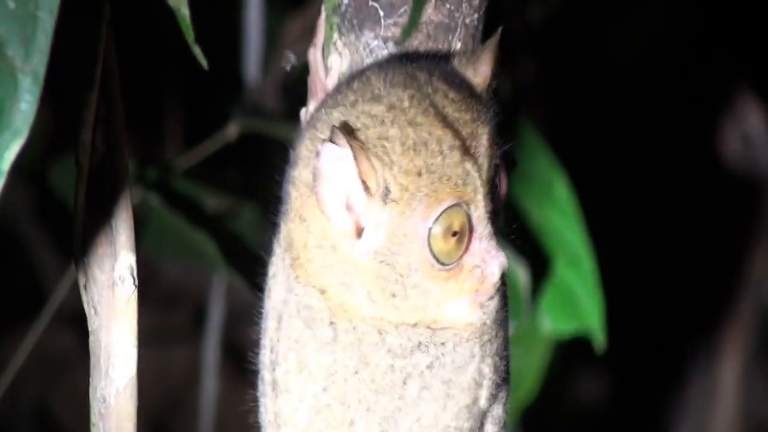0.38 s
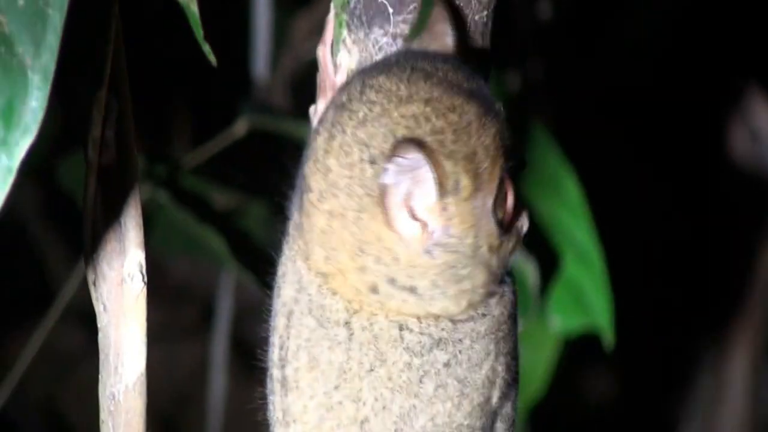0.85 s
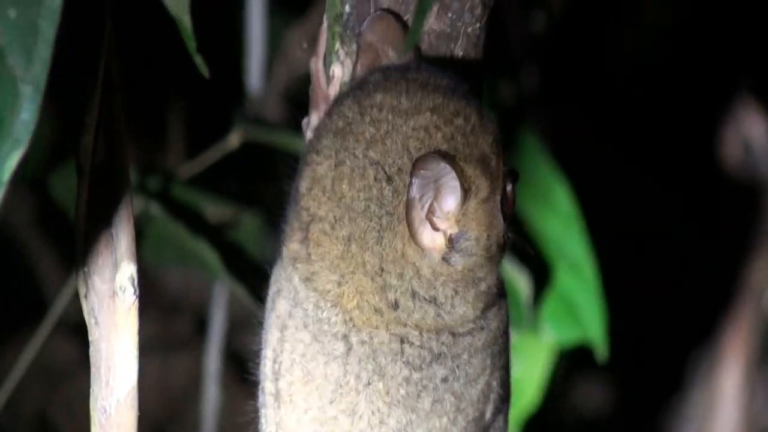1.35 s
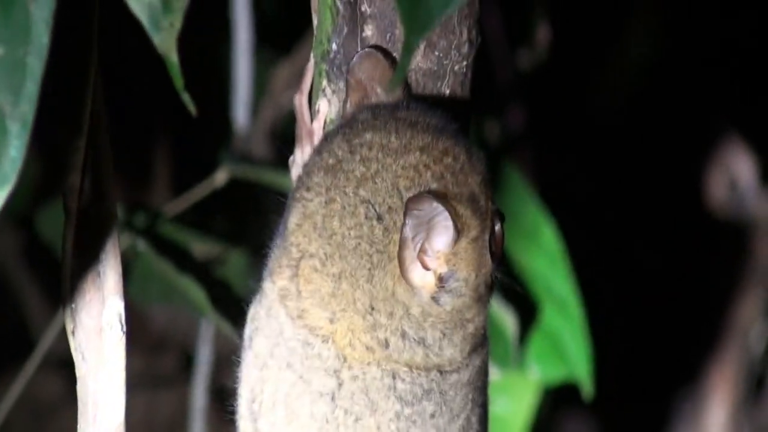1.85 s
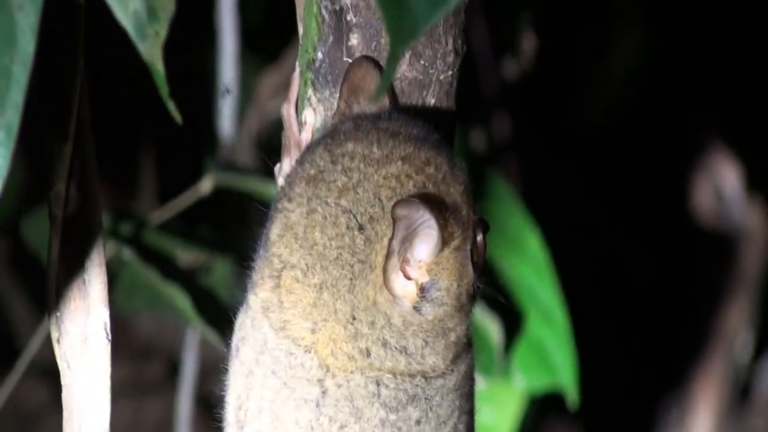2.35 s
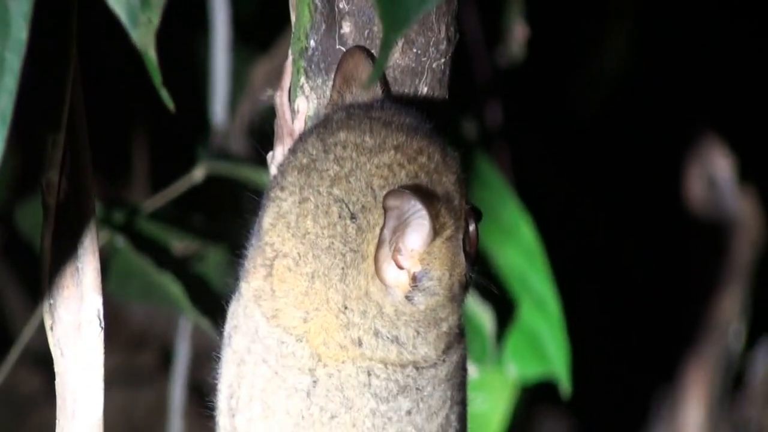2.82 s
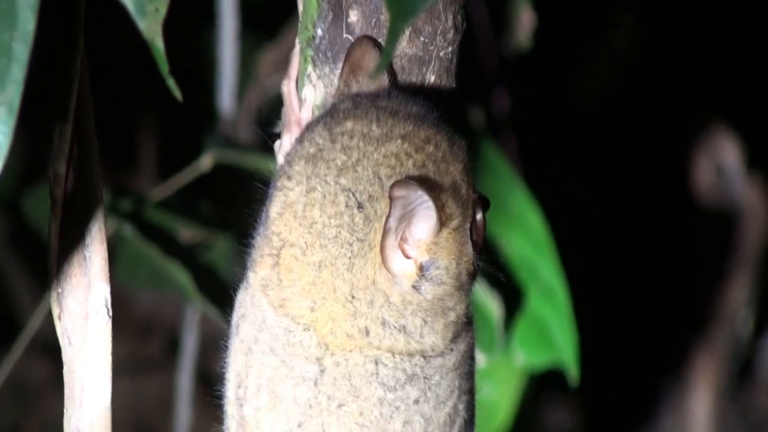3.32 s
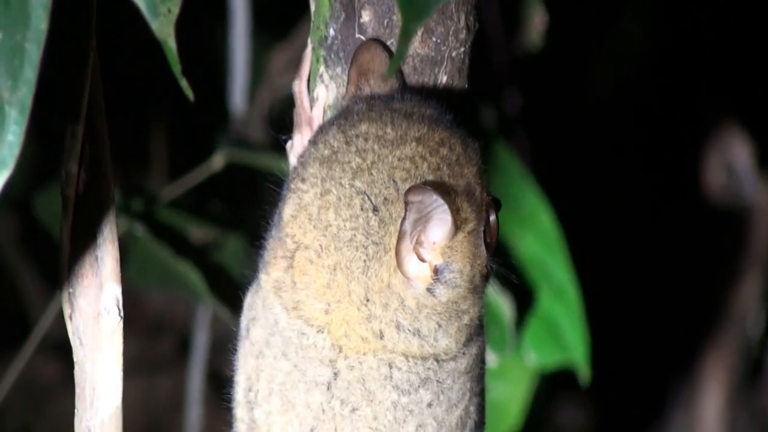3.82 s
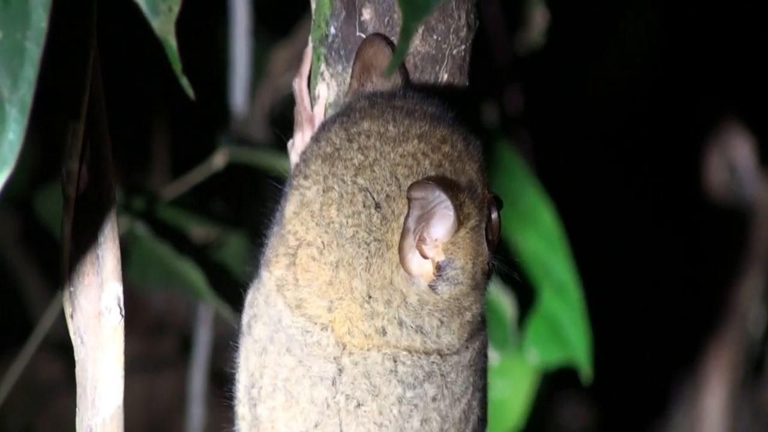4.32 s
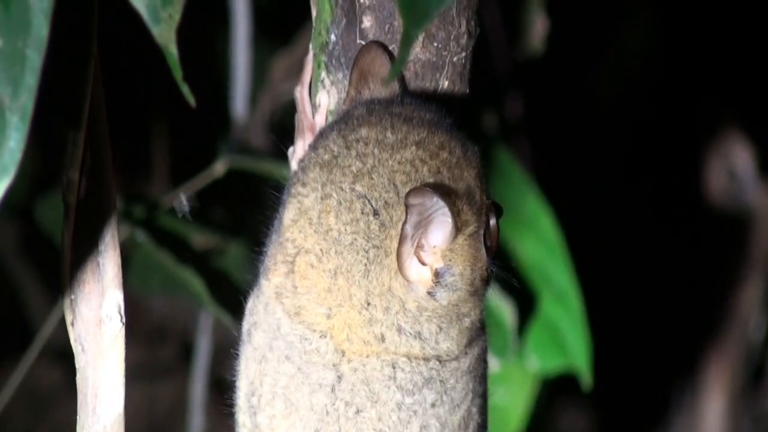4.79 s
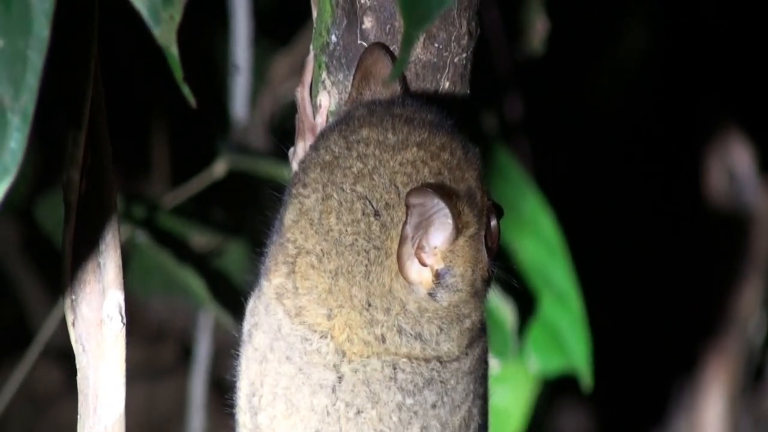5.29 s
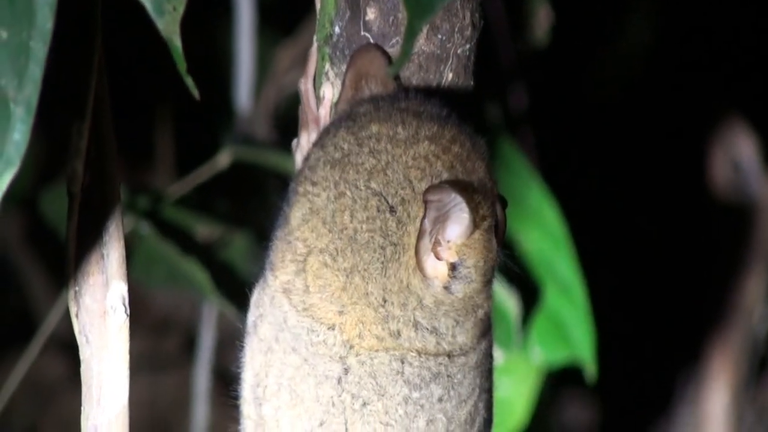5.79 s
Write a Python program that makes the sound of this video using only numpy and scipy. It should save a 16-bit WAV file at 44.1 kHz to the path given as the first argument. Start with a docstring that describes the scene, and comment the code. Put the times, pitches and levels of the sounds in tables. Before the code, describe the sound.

A steady, high ringing chorus of far night insects fills about six seconds, dense around 4 to 7 kHz with a thinner sheen above, over soft dull hiss and a barely audible hum. A near cricket, a little left, gives short purring trills near 4.9 kHz at 0.0, 0.8, 1.9, 2.8, 4.0 and 5.2 s, with a faint trunk echo. Higher answering trills near 6.2 kHz come at 0.3, 0.9, 1.6, 2.2, 3.0, 3.8, 4.4, 5.0 and 5.6. Tiny double chirps repeat every half second until 4.2. Far rasps pulse quickly, and a faint whistler swells in phrases. Drips and bright snaps cluster at 0.3-0.55, then tick at 2.5 and 2.9, with softer drips at 4.0 and 5.2. Very high trills appear around 2.7-3.3 and from 4.9; thin squeaks pass near 1.6 and 5.3, with a faint low warble about 5.5. A crisp buzzer enters at 5.7.

```python
"""Rainforest night chorus

One near cricket trills about once a second; others answer higher up, each at its own wing pitch and stroke
rate: tones gated and slid stroke by stroke. Far singers blur into ringing bands of flickering noise.
Drips and snaps are band-filtered clicks, foliage echoes the songs, the camera hums faintly under hiss."""
import sys
import numpy as np
from scipy import signal
from scipy.fft import rfft, irfft
from scipy.io import wavfile
from scipy.ndimage import uniform_filter1d

SR = 44100
rng = np.random.default_rng(int(sys.argv[2]) if len(sys.argv) > 2 else 0)


def output_pcm(signal):
    """Save a mono or channel-first signal as 16-bit PCM at the path in sys.argv[1].

    Samples are clipped to [-1, 1] before scaling.
    """
    pcm = np.clip(np.atleast_2d(signal).T, -1, 1) * 32767
    wavfile.write(sys.argv[1], SR, np.round(pcm).astype(np.int16))


def gain_from_db(level_db):
    """Turn a decibel level (scalar or array-like) into a linear amplitude factor."""
    decades = np.asarray(level_db, float) / 20
    return 10 ** decades


N = 271215
T = np.arange(N) / SR


def walk(rate_hz):
    """Random levels held 1 / rate_hz and slewed twice; spread near 1."""
    k = int(SR / rate_hz)
    held = np.repeat(rng.standard_normal(N // k + 1), k)
    return 1.3 * uniform_filter1d(uniform_filter1d(held, k), k)[:N]


def place(x, pan_db):
    """Left and right at the given level difference."""
    return x * gain_from_db(np.array([pan_db / 2 + 0 * T, -pan_db / 2 + 0 * T]))


def read(rows, fade_s=0.0054):
    """Gate that fades outside a curve's span, then the curve's columns at every sample."""
    s, *columns = np.transpose(rows)
    gate = np.clip(np.minimum(T - s[0], s[-1] - T) / fade_s + 1, 0, 1)
    return [gate] + [np.interp(T, s, c) for c in columns]


def note(start_s, length_s, attack_s, release_s):
    """Envelope: linear swell, hold to the end of length_s, linear fade."""
    swell = (T - start_s) / attack_s
    fade = (start_s + length_s - T) / release_s + 1
    return np.clip(np.minimum(swell, fade), 0, 1)


def strokes(comb_hz, wing_hz, rate_hz, rise_hz, duty, jitter, scatter_db, slip_turns, start_s=None, modes=()):
    """Scraped wing: each stroke swells, fades and slides in pitch; the ring's phase drifts between strokes.

    modes: (multiple of the ring, Hz below it, level dB)."""
    count = np.cumsum(rate_hz * (1 + jitter * walk(30))) / SR + rng.random()
    if start_s is not None:
        count = np.maximum(count - count[int(start_s * SR)], 0)
    index, part = count.astype(int), count % 1
    size_db, drift = rng.standard_normal((N // 100, 2)).T
    swell = np.sin(np.pi * np.clip(part / duty, 0, 1)) ** .65
    # the slide sums to nothing over a stroke: the comb stays put while the resonance moves over it
    slide = ((wing_hz - comb_hz) * part + rise_hz * (part * part - part) / 2) / rate_hz
    turns = comb_hz * T + slide + slip_turns * np.cumsum(drift)[index]
    ring = np.sin(2 * np.pi * turns)
    for multiple, below_hz, db in modes:
        ring = ring + gain_from_db(db) * np.sin(2 * np.pi * (multiple * turns - below_hz * part / rate_hz))
    swell_rms = np.sqrt(np.mean(swell[count > 0] ** 2) / 2)
    return gain_from_db(scatter_db * size_db)[index] * swell * ring / swell_rms


# faint hum tones: pitch_hz, level_db
HUM = [(840, -79.5), (1190, -86)]


def hum():
    """Faint camera tones: sines wavering slowly in level."""
    return sum(np.sqrt(2) * gain_from_db(db + 2.4 * walk(6.6)) * np.sin(2 * np.pi * hz * T) for hz, db in HUM)


# side level against mid, for all the hiss: freq_hz, side_db
SIDE_WIDTH = [(30, -13), (60, -23), (110, -8.5), (200, -2.5), (380, 0), (1290, 2.5), (2380, 1),
              (4400, -4.5), (8120, -18.5), (11300, -3), (11800, -37)]


def hiss(colour_rows, level_db, flicker_db):
    """Coloured noise in overlapping bands half an octave apart, each flickering alone; ears partly alike."""
    hz = np.maximum(np.arange(N // 2 + 1) * SR / N, 1)

    def curve(rows):
        points_hz, db = np.transpose(rows)
        return gain_from_db(np.interp(np.log(hz), np.log(points_hz), db))

    colour = curve(colour_rows)
    mid = rfft(rng.standard_normal(N)) * colour
    side = rfft(rng.standard_normal(N)) * colour * curve(SIDE_WIDTH)
    out = 0
    for octave in np.arange(4, 14.5, .5):
        band = np.cos(np.pi * np.clip(np.log2(hz) - octave, -.5, .5))
        out = out + gain_from_db(flicker_db * walk(9)) * irfft(band * band * np.array([mid + side, mid - side]), N)
    return out * gain_from_db(level_db) / np.std(out.mean(axis=0))


# colour of the air: freq_hz, relative_density_db
AIR = [(15, -42), (25, -23), (70, -1), (299, -3.5), (409, -1.5), (753, -4), (837, -2.5), (910, -4),
       (3280, -11), (3570, -11), (3800, -18.5), (4940, -26), (8360, -120)]


def air():
    """Dull hiss of the air: noise falling away towards the treble."""
    return hiss(AIR, level_db=-65.5, flicker_db=1.16)


def band_noise(low_hz, high_hz):
    """Noise through a steep band, at unit rms."""
    band = signal.butter(4, (low_hz, high_hz), "band", fs=SR, output="sos")
    noise = signal.sosfilt(band, rng.standard_normal(N))
    return noise / noise.std()


# low rumble level curve: time_s, level_db
RUMBLE = [(0.0, -87), (1.0, -77), (1.6, -83.5), (3.4, -77), (3.8, -77.5), (4.26, -69.5), (4.71, -70),
          (4.98, -75.5), (6.15, -74)]


def rumble():
    """Dull low noise that grows later on."""
    return gain_from_db(read(RUMBLE)[1]) * band_noise(60, 93)


# very high katydid swells: start_s, length_s, level_db
HIGH_KATYDID = [(.45, .22, -72), (.98, .22, -71), (1.54, .1, -73)]


def high_katydid():
    """Very high katydid: thin noise at the very top, swelling slowly and fading faster."""
    gain = sum(gain_from_db(db) * note(s, length, attack_s=.12, release_s=.06) for s, length, db in HIGH_KATYDID)
    return gain * band_noise(15000, 15800)


# colour of the blurred chorus: freq_hz, relative_density_db
CHORUS = [(2180, -19), (3700, -19.5), (3930, -10), (4290, -1), (4710, 3.5), (4990, 2.5), (5230, -15),
          (5720, -0.5), (6160, -2.5), (6530, 1), (6760, -22), (7250, -20), (7400, -14), (9620, -43),
          (16300, -120)]
# colour of its upper sheen: freq_hz, relative_density_db
SHEEN = [(4350, -41), (7400, 6.5), (7810, 1), (8160, -50.5), (9000, 3), (9870, -5), (10900, -6),
         (11500, -15), (12500, -4.5), (15100, -11.5), (15800, -6)]


def blurred_chorus():
    """Singers too many and far to tell apart: noise peaked into ringing bands."""
    return hiss(CHORUS, level_db=-57.5, flicker_db=1.12) + hiss(SHEEN, level_db=-66.5, flicker_db=1.0)


def low_crowd():
    """Far low crickets: five stroked tones at their own pitches and rates."""
    singers = [(4370, 62.), (4450, 81.), (4560, 36.0), (4700, 54.0), (4810, 200.0)]  # pitch_hz, rate_hz
    crowd = sum(gain_from_db(-70.5 + 3.2 * walk(5)) * strokes(hz, hz, rate, 110, 1.0, .05, 1.4, 0.25)
                for hz, rate in singers)
    return place(crowd, 1.0)


# katydid rasp bands: pitch_hz, scrape_rate_hz, added_burst_db, steady_db
RASPS = [(7945, 260., -76.5, -75), (8685, 290., -69, -79)]


def rasping_katydid():
    """Far katydid: fast uneven scrapes smear over wide bands, in even bursts."""
    first_s, every_s, sounding_share = -0.016, .268, .65
    phase = (T - first_s) / every_s % 1
    bursts = np.sin(np.pi * np.clip(phase / sounding_share, 0, 1))
    out = 0
    for hz, rate, burst_db, steady_db in RASPS:
        gain = (gain_from_db(steady_db) + gain_from_db(burst_db) * bursts) * gain_from_db(2.0 * walk(4.04))
        out = out + gain * strokes(hz, hz, rate, -800, 0.98, .3, 2.9, .4)
    return place(out, .2)


# ticker level curve: time_s, level_db
TICKER = [(0, -69.5), (1.2, -73.5), (2.0, -70), (4.75, -71), (5.0, -80), (6.15, -74)]


def ticker():
    """Far ticker: slow, very uneven strokes."""
    gain = gain_from_db(read(TICKER)[1] + 2.8 * walk(12))
    return place(gain * strokes(7080, 7080, 34., -200, 0.95, .4, 3.4, 0.34), .8)


# whistler phrases: start_s, length_s, level_db
WHISTLE = [(-.3, 0.84, -64), (1.0, .85, -67.5), (2.497, 0.8, -66), (3.852, 0.76, -62.5), (5.0, 0.81, -65.5)]


def whistler():
    """Far whistler: stroked tone whose pitch climbs into each phrase."""
    wing_hz, slack_hz, settle_s = 5982, 300, .3
    out = 0
    for s, length, db in WHISTLE:
        hz = wing_hz - slack_hz * np.exp(-np.maximum(T - s, 0) / settle_s)
        gain = gain_from_db(db + 2.0 * walk(12)) * note(s, length, attack_s=.25, release_s=.08)
        out = out + gain * strokes(5945, hz, 118., -100, 0.91, 0.017, 3.2, 0.1515)
    return place(out, 1.5)


def buzzer():
    """Crisp falling pulses whose pitch climbs as the song starts."""
    start_s, attack_s, level_db = 5.66, .1, -65.5
    wing_hz, slack_hz, settle_s = 9430, 330, 0.22
    after_s = np.maximum(T - start_s, 0)
    hz = wing_hz - slack_hz * np.exp(-after_s / settle_s)
    gain = np.minimum(after_s / attack_s, 1) * gain_from_db(level_db)
    return gain * strokes(9500, hz, 54., -700, .45, .015, 1.2, .3)


# squeaks and a low warble, one curve each: time_s, pitch_hz
GLIDES = [
    [(1.52, 9260), (1.598, 11100), (1.644, 11200), (1.68, 10420), (1.722, 10240), (1.75, 11400),
     (1.81, 11700)],
    [(5.16, 11000), (5.21, 11500), (5.27, 10750), (5.324, 10500), (5.39, 9700), (5.452, 9700), (5.5, 10400),
     (5.53, 10400)],
    [(5.33, 200), (5.376, 208.5), (5.41, 260), (5.444, 281.4), (5.512, 275.3), (5.572, 212), (5.612, 256.4),
     (5.7, 222)],
]
# one per curve: level_db
GLIDES_DB = [-75, -72.5, -73.5]


def glides():
    """Thin sines that wander and waver in pitch and level."""
    out = 0
    for rows, db in zip(GLIDES, GLIDES_DB):
        gate, hz = read(rows, fade_s=.02)
        wavering_hz = hz * (1 + .009 * walk(400))
        tone = np.sin(2 * np.pi * np.cumsum(wavering_hz) / SR)
        out = out + gate * gain_from_db(db + 3.8 * walk(40)) * tone
    return out


def burst(start_s, peak_db, hz, width_hz, t60_s):
    """Click and decaying noise tail through a band."""
    edges_hz = np.clip([hz - width_hz / 2, hz + width_hz / 2], 100, .49 * SR)
    after_s = np.arange(SR // 2) / SR
    push = 0.13 * rng.standard_normal(SR // 2) * 1000 ** (-after_s / t60_s)
    push[0] = 1
    ring = signal.sosfilt(signal.butter(2, edges_hz, "band", fs=SR, output="sos"), push)
    out = np.zeros(N + SR)
    out[int(start_s * SR):][:SR // 2] = gain_from_db(peak_db) * ring / np.abs(ring).max()
    return out[:N]


# bright snaps and rustles: start_s, peak_db, centre_hz, tail_t60_s, width_hz
SNAPS = [(.329, -47.5, 10350, .04, 5000), (.397, -54, 11000, 0.044, 5000), (.446, -49, 10900, .04, 5000),
         (.545, -49, 12000, 0.044, 5000), (2.517, -44, 8300, 0.034, 1600), (2.517, -48, 13800, 0.26, 3000),
         (2.969, -49, 12100, .06, 2500)]


def snaps():
    """Twigs snap and rustle: bright bursts, centred."""
    return sum(burst(s, db, hz, width_hz, t60_s) for s, db, hz, t60_s, width_hz in SNAPS)


# drips on leaves: start_s, peak_db (before panning), centre_hz, left_minus_right_db, width_hz
DRIPS = [(.329, -43, 2930, 8, 1410), (.397, -49, 3020, 4, 1500), (.446, -50.5, 3300, 4, 1500),
         (.541, -54, 1130, 6, 600), (.872, -56, 2110, 6, 1200), (1.745, -52.5, 680, -5, 248),
         (2.517, -48, 2000, 7, 3000), (2.886, -43.5, 2200, 2, 3220), (3.956, -51, 2000, 0, 800),
         (5.162, -48.5, 2000, .5, 1490)]


def drips():
    """Drips tick on leaves: short panned bursts."""
    return sum(place(burst(s, db, hz, width_hz, t60_s=.03), pan_db) for s, db, hz, pan_db, width_hz in DRIPS)


# double chirps: start_s, first_peak_db, gap_s, second_peak_db (peaks before panning)
CHIRPS = [(.017, -57, .04, -62), (.525, -58, .04, -58), (1.045, -64, 0.042, -57), (1.57, -57, .033, -57),
          (2.089, -59, 0.038, -55), (2.597, -62, 0.028, -56), (3.141, -59, 0.038, -58),
          (3.663, -59, .055, -56.5), (4.218, -57.5, 0.042, -60)]


def chirps():
    """Pairs of short bell-shaped tones; the first comes more from the left."""
    tone = np.sin(2 * np.pi * 7590 * T)
    out = 0
    for s, first_db, gap_s, second_db in CHIRPS:
        for at_s, db, pan_db in [(s, first_db, 7.5), (s + gap_s, second_db, -1)]:
            bell = np.exp(-((T - at_s - .008) / 0.014) ** 2)
            out = out + place(gain_from_db(db) * bell * tone, pan_db)
    return out


# high triller notes: start_s, length_s, level_db, pitch_hz
HIGH = [(2.72, 0.076, -69, 8900), (2.86, 0.35, -67.5, 9050), (3.25, .07, -71, 8860),
        (4.92, .11, -66.5, 8800), (5.07, 0.1, -65, 8760), (5.22, .1, -66.5, 8850), (5.35, 0.31, -65, 8850),
        (5.68, 0.14, -65.5, 8830)]


def high_trillers():
    """High trills: 190 strokes a second, nearly merging."""
    out = 0
    for s, length, db, hz in HIGH:
        gain = gain_from_db(db) * note(s, length, attack_s=.021, release_s=.021)
        out = out + place(gain * strokes(hz, hz, 190.0, -78, 0.88, 0.006, 1.7, 0.069), 0.55)
    return out


# answering cricket trills: start_s, length_s, level_db
ANSWER = [(0.327, 0.29, -57), (0.946, 0.23, -56), (1.574, 0.25, -56), (2.235, 0.24, -56.5),
          (3.047, 0.22, -56.5), (3.787, 0.24, -56.5), (4.421, 0.24, -56), (4.99, 0.26, -55.5),
          (5.643, .26, -56)]


def answering_cricket():
    """Answering trills: falling strokes with a wing mode on either side of the ring."""
    trills = sum(gain_from_db(db) * note(s, length, attack_s=.04, release_s=.068) for s, length, db in ANSWER)
    song = strokes(6200, 6225, 97., -400, 0.69, .04, 1.8, .22, modes=[(1, -190, -9), (1, 139, -8)])
    return place(trills * gain_from_db(0.5 * walk(14)) * song, 4.7)


# near cricket trills, each a steady comb: start_s, length_s, level_db, comb_line_hz, lower_mode_db
NEAR = [(0.005, 0.035, -55.5, 4910, -10), (0.043, 0.25, -46, 4925, -10), (.836, 0.15, -46.5, 4930, -8.5),
        (1.853, 0.25, -46.5, 4922, -11), (2.843, 0.192, -47.5, 4895, -5.5), (4.024, 0.21, -47, 4907, -5.5),
        (5.191, 0.26, -48, 4901, -5.5)]


def near_cricket():
    """Seventy strokes a second; a lower wing mode beats with the main one; a trunk's echo comes 50 ms late."""
    out = 0
    for start_s, length_s, db, comb_hz, low_db in NEAR:
        # the first strokes are slack and ring lower
        wing_hz = 4897 - 120 * np.exp(-np.maximum(T - start_s, 0) / .045)
        modes = [(1, 175, low_db), (2, 0, -44), (2, 250, -44), (3, 0, -41), (3, 250, -41), (3, 500, -43)]
        song = strokes(comb_hz, wing_hz, 70., 90, 1, .006, 1.3, .05, start_s=start_s, modes=modes)
        song = song * gain_from_db(db) * note(start_s - .001, length_s, attack_s=.003, release_s=.0065)
        echo = gain_from_db(-13) * np.roll(song, SR // 20)
        out = out + place(song, 4.5) + place(echo, 2.5)
    return out


def foliage(x, t60_s, wet_db, side_db):
    """Scattered echoes off trunks and leaves: swelling, decaying noise, partly different at each ear."""
    after_s = np.arange(SR // 2) / SR
    envelope = 1000 ** (-after_s / t60_s) * (1 - np.exp(-after_s / 0.035))
    mid, side = rng.standard_normal((2, SR // 2)) * envelope
    echoes = np.array([mid + gain_from_db(side_db) * side, mid - gain_from_db(side_db) * side])
    echoes = echoes * gain_from_db(wet_db) / np.sqrt(np.sum(mid ** 2))
    return x + signal.fftconvolve(x, echoes, axes=1)[:, :N]


def scene():
    """Singers and drips in the foliage over the blurred chorus, air and hum."""
    floor = hum() + air() + rumble() + high_katydid() + blurred_chorus()
    far = low_crowd() + rasping_katydid() + ticker() + whistler()
    close = glides() + snaps() + drips() + chirps() + high_trillers() + answering_cricket() + near_cricket()
    far = foliage(far, t60_s=.4, wet_db=-8, side_db=-6)
    close = foliage(close, t60_s=.5, wet_db=-10, side_db=-3)
    return floor + far + buzzer() + close


def low_pass(x):
    """Removes everything above the highest recorded frequency."""
    return signal.sosfilt(signal.butter(12, 15920, fs=SR, output="sos"), x)


def record(dry):
    """The finished stereo mix, as stored."""
    return low_pass(dry)


dry = scene()
out = record(dry)
output_pcm(out)
```